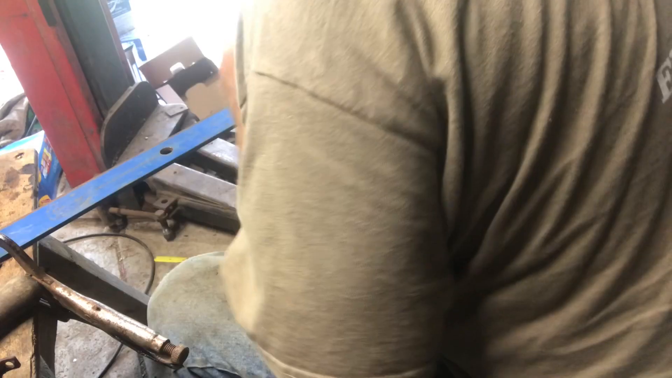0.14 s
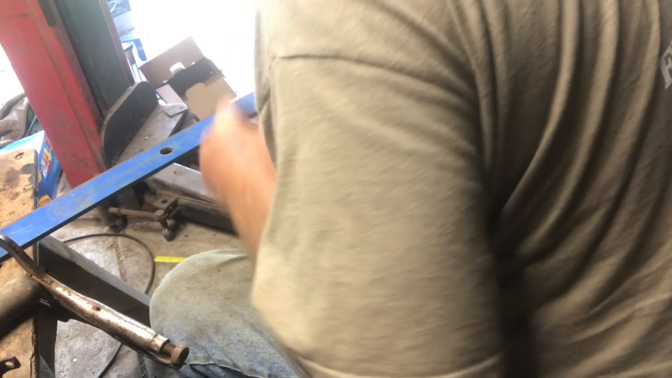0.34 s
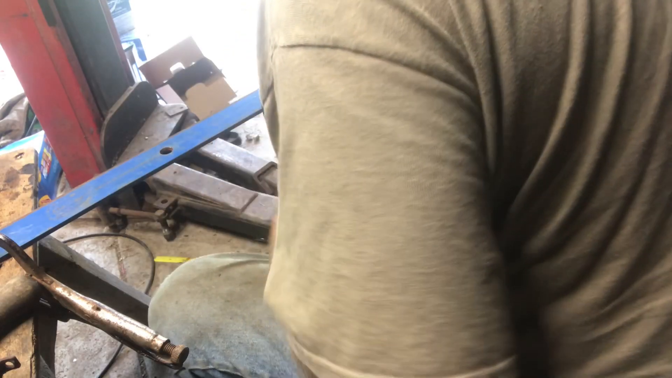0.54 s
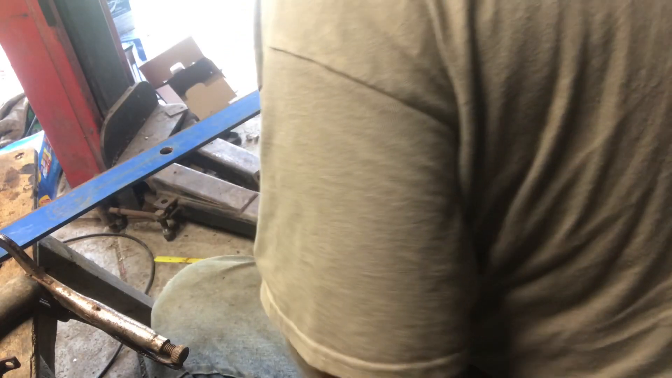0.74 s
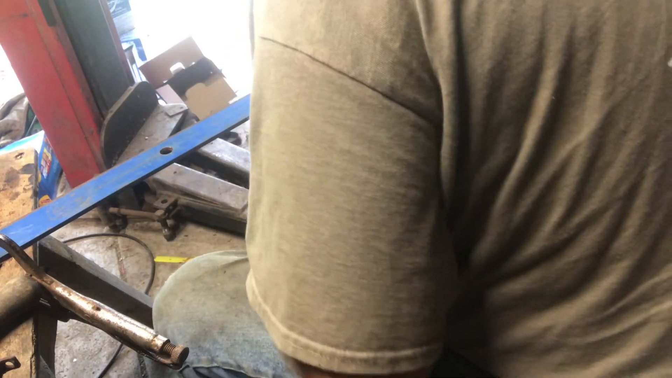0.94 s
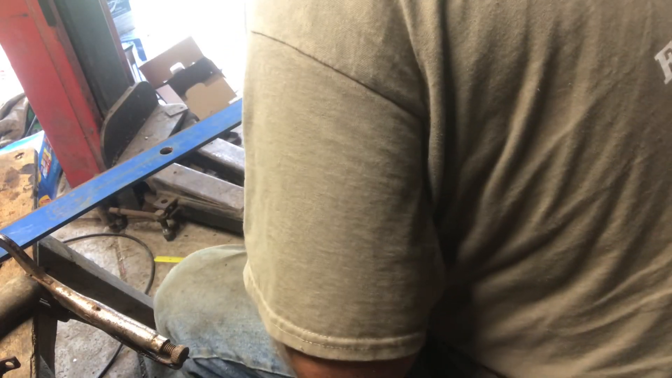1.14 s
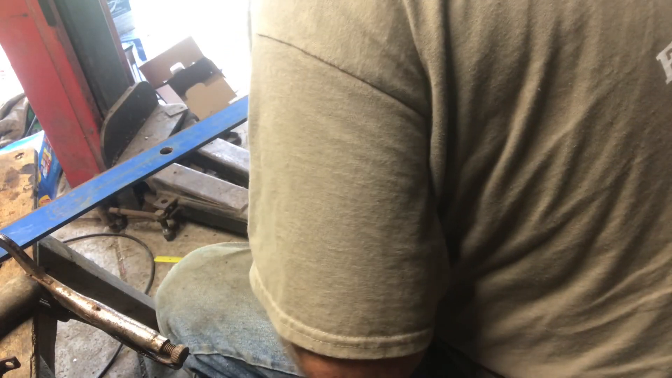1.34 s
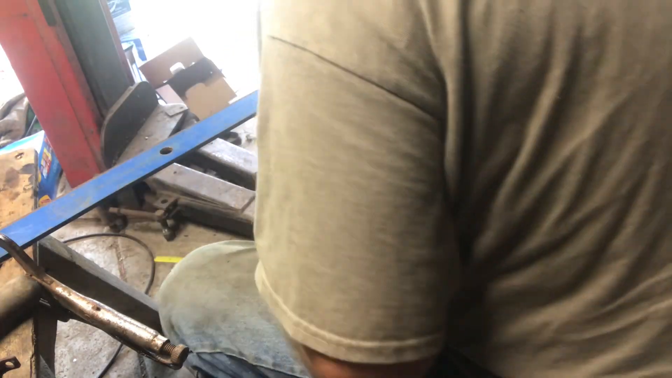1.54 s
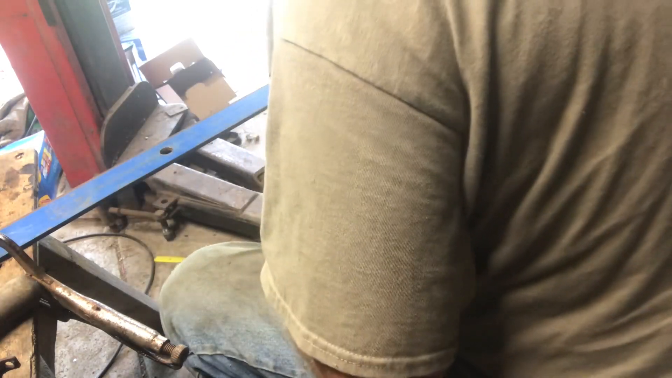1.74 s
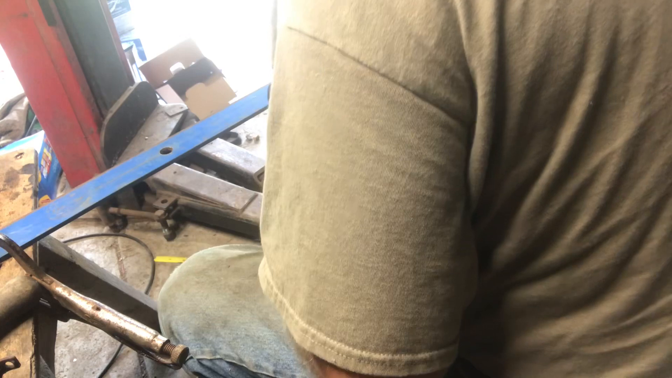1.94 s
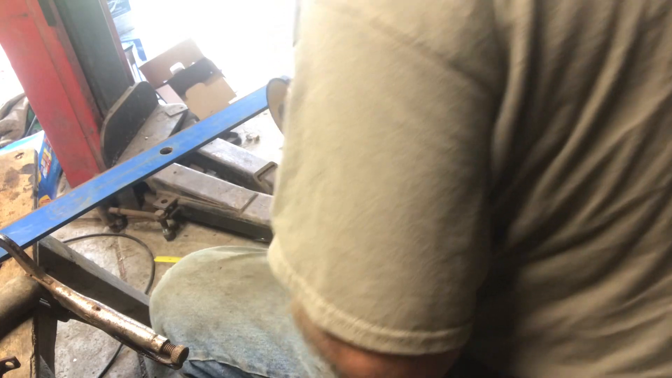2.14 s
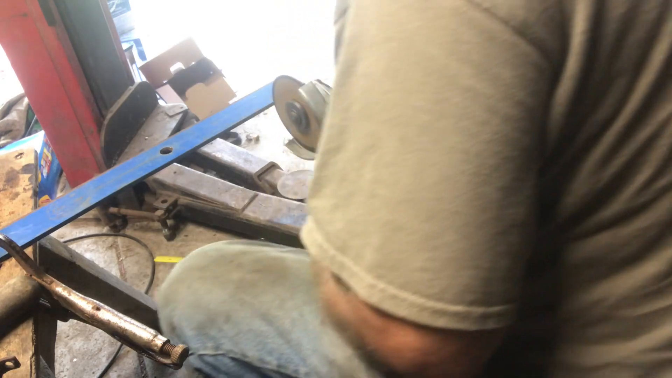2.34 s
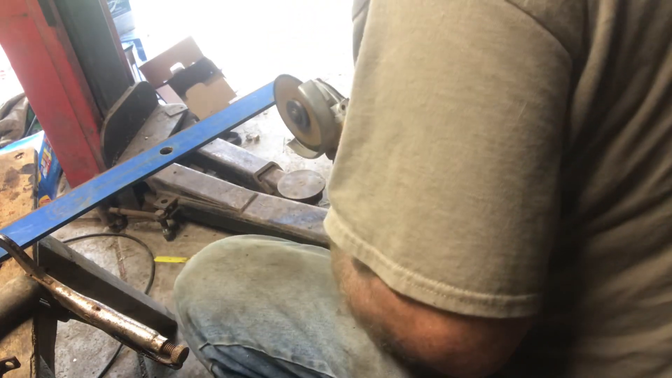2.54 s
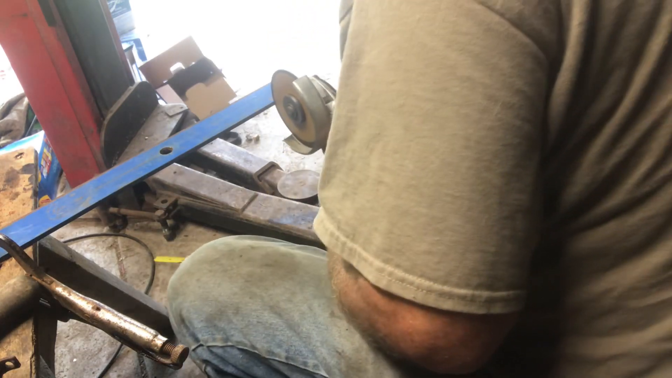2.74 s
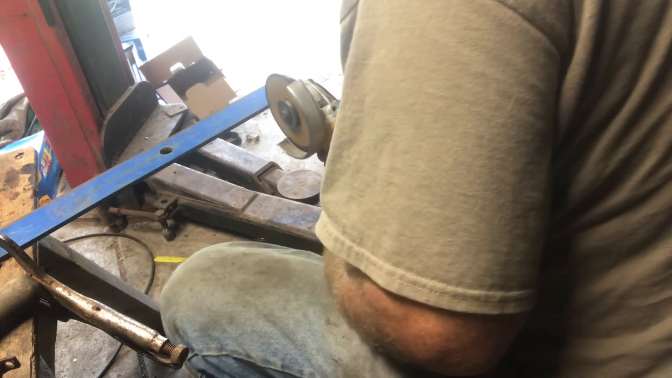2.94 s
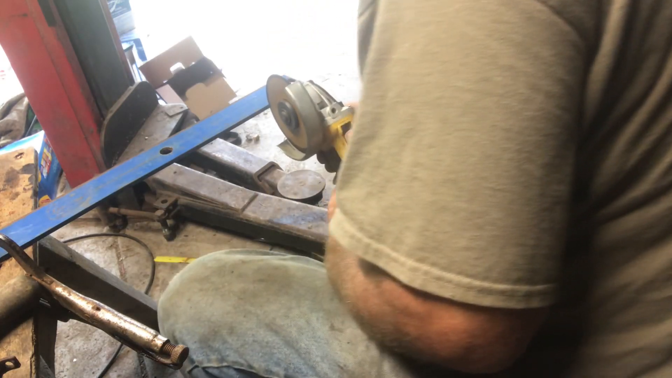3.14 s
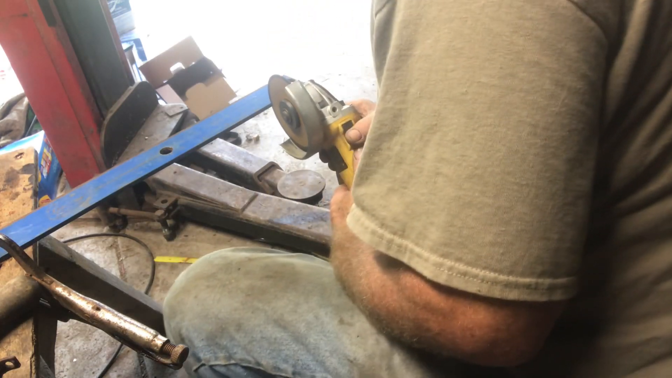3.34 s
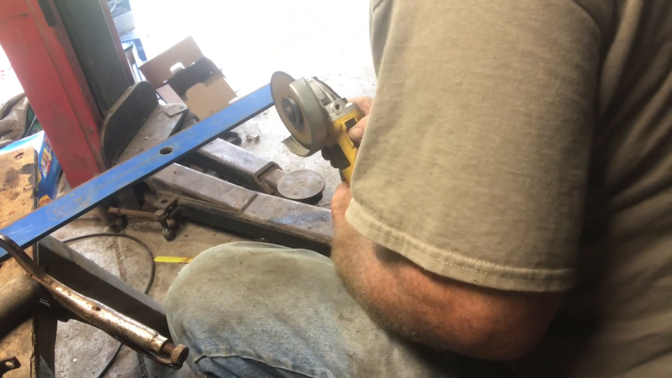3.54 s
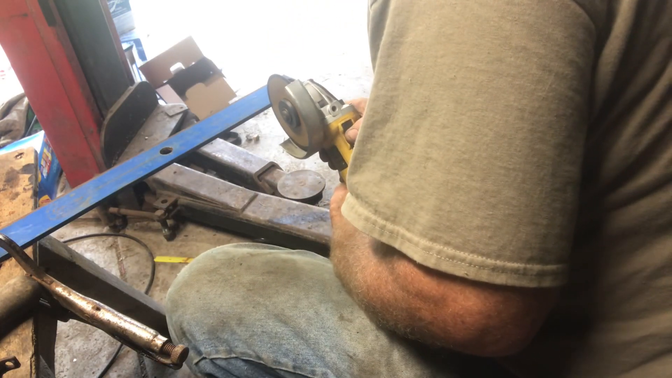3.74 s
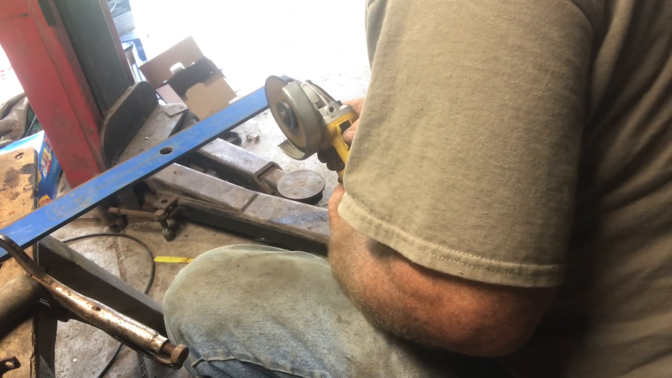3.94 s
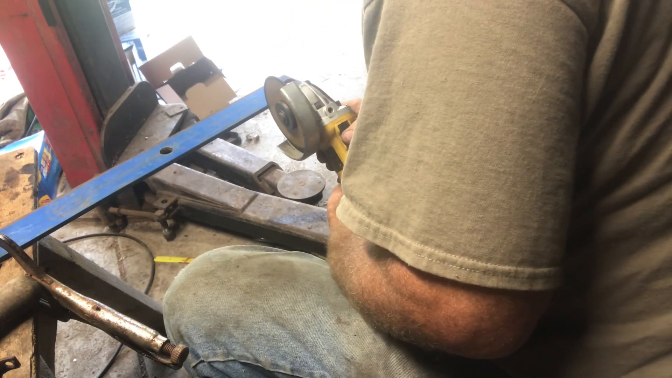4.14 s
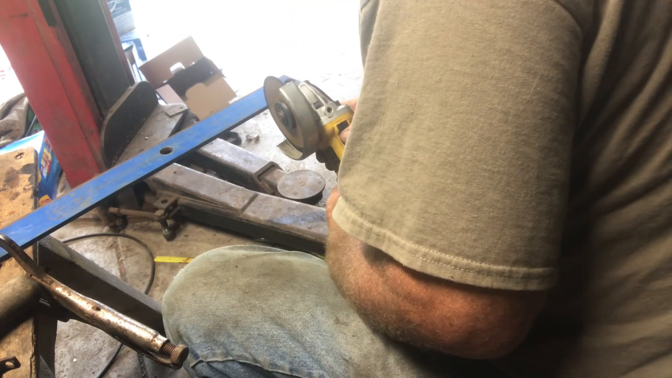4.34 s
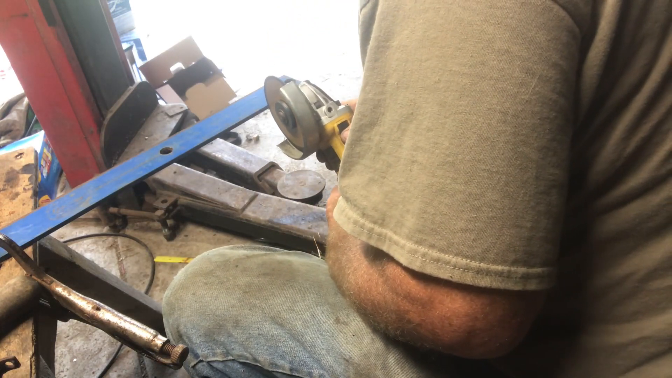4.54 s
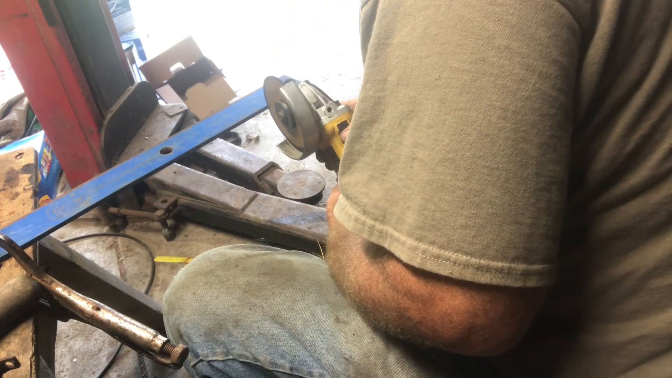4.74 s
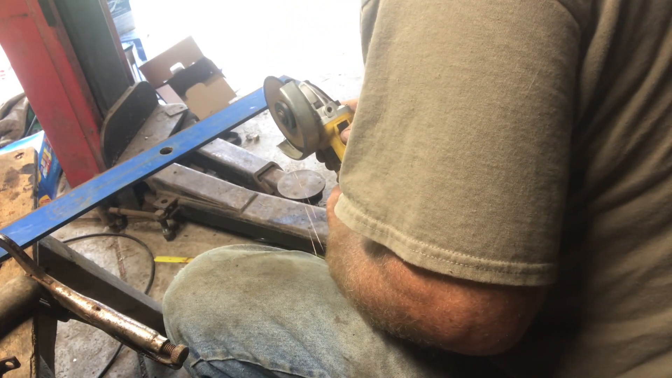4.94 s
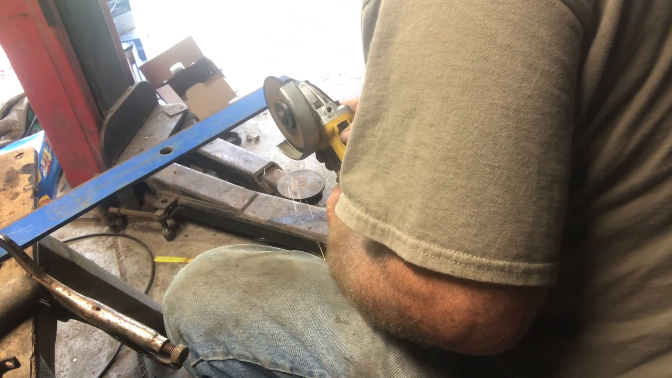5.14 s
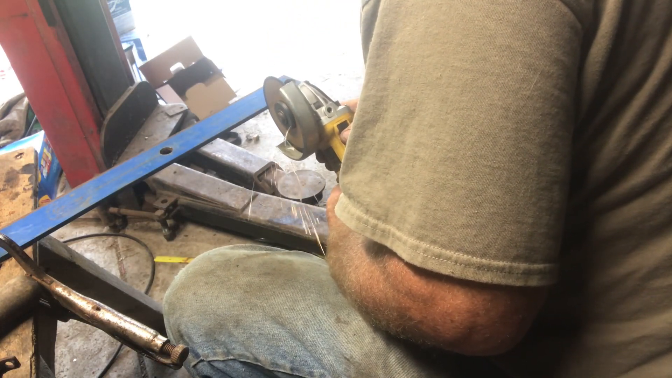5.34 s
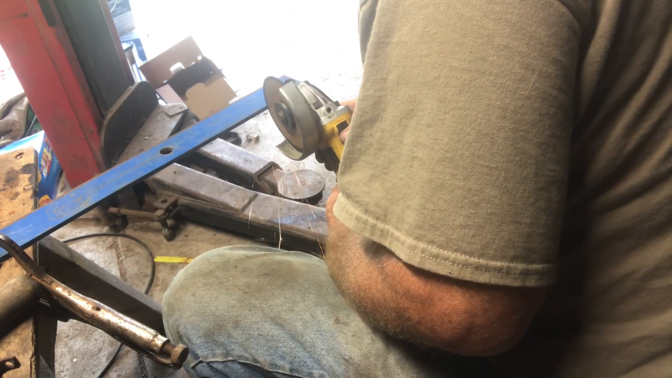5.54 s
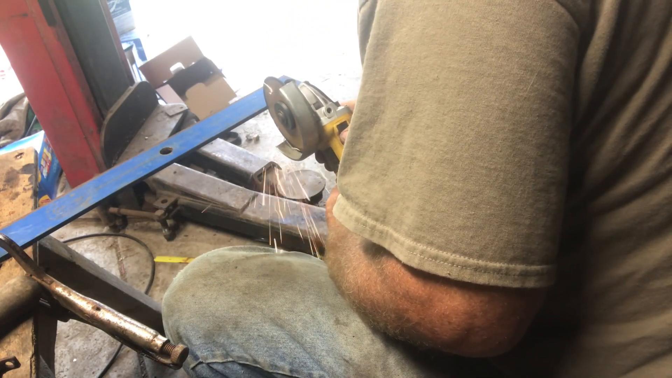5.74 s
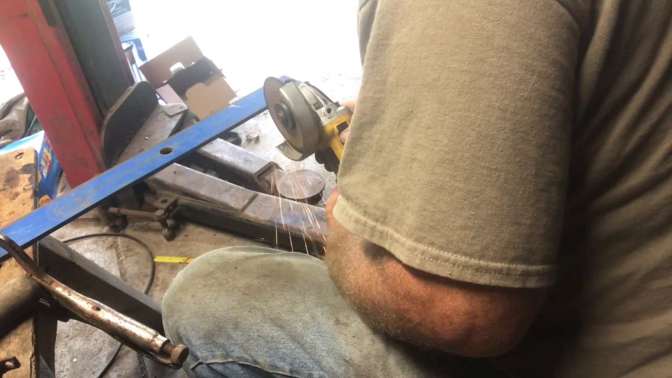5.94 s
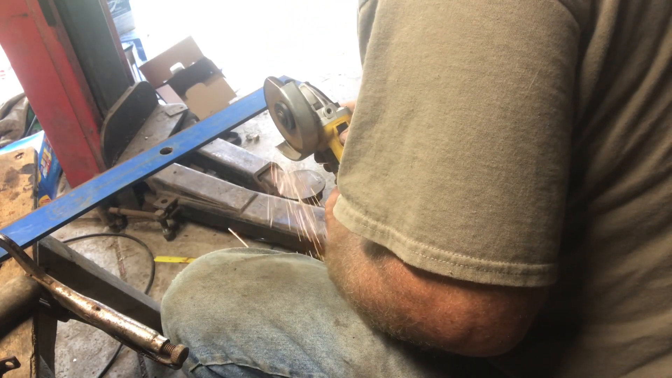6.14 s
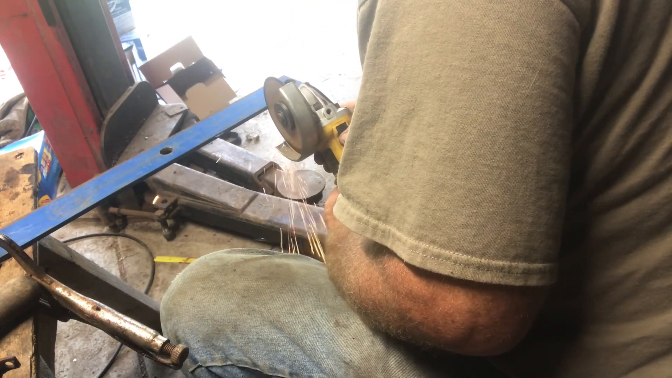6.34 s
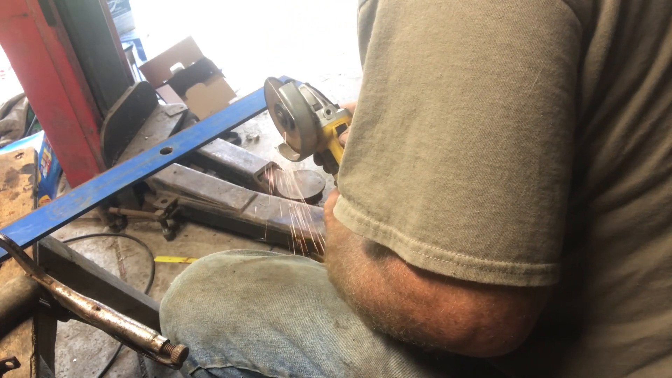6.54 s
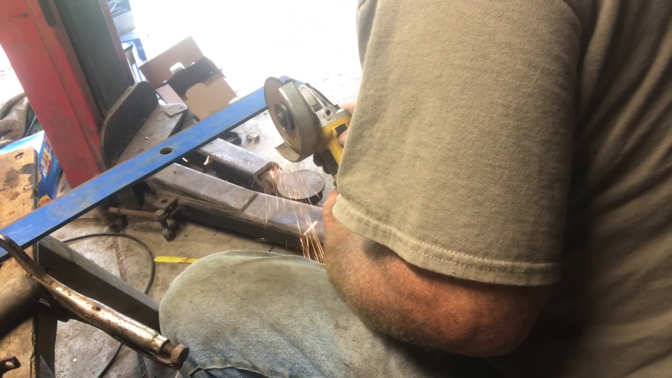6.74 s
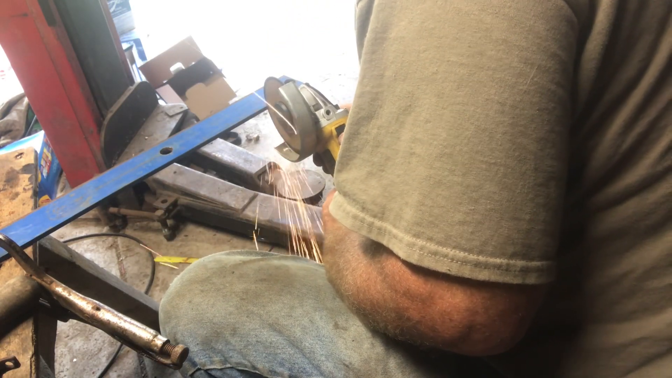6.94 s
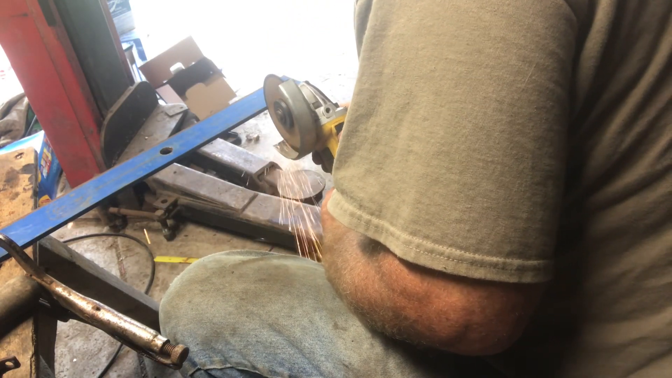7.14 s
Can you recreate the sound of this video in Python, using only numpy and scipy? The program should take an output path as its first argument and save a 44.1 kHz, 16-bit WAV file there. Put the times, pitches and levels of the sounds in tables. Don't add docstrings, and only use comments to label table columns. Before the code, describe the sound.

A brief low outdoor murmur cuts to near silence with a faint high cricket. After a click and small clattering knocks, an angle grinder spins up close by, gears rattling and fan hissing, and holds steady. It then grinds into steel with coarse raspy friction and a deep flexing drone that grows, judders and stutters as the tones sag. One close microphone; the cut continues to the end.

```python
import sys
import numpy as np
from scipy import signal
from scipy.fft import rfft, irfft, next_fast_len
from scipy.io import wavfile
from scipy.ndimage import uniform_filter1d, map_coordinates

SR = 44100
rng = np.random.default_rng(int(sys.argv[2]) if len(sys.argv) > 2 else 0)


def bounce(signal):
    frames = np.transpose(np.atleast_2d(signal))
    limited = np.clip(frames, -1, 1)
    pcm = np.round(limited * 32767).astype(np.int16)
    wavfile.write(sys.argv[1], SR, pcm)


def convert_level_to_amplitude(level_db):
    exponent = np.asarray(level_db, float) / 20
    return 10 ** exponent


N = 317079

# pitch_hz, density_db
YARD_SPECTRUM = [(18, -47), (30, -17), (55, -2), (107, 0), (158, -18), (328, -20.5), (404, -28), (629, -22),
                 (1270, -22), (2080, -37), (3150, -38), (3880, -42), (15000, -54)]
AIR_SPECTRUM = [(120, -7), (200, -3), (450, -8), (1000, -5), (2000, -14.5), (4300, -20.5), (5300, -25.5),
                (6300, -12), (7200, -26.5), (14000, -34), (15700, -31)]
RUMBLE_SPECTRUM = [(15, -37), (25, -16), (43, -8.5), (70, -2.5), (102, 1), (141, -10), (220, -21),
                   (290, -50), (480, -120)]
YARD_DB, AIR_DB, RUMBLE_DB = -50, -72, -67
# start_s, fade_out_s, fade_in_s
SCENE_CHANGE = (.141, .014, .04)
# start_s, change_db, half_length_s
GUST = (.6, 2.7, 0.077)
# start_level_db, free_speed_gain_db, full_load_gain_db
SHUDDER = (-66, 5, 8)
# pitch_hz, pitch_hz
WING_HZ = (6500, 6140)
# level_db, rise_db_per_s
CRICKET = (-74.5, 1)

ON_S, TOUCH_S = 1.47, 4.5
# pitch_hz, level_db, decay_t60_s
SWITCH_RING = [(1900, -23, .025), (3300, -31, .015), (7500, -46, .01), (13500, -57, .01)]
# start_s, level_db, decay_t60_s
KNOCKS = [
    (1.471, -34, 0.0087),
    (1.4806, -28, 0.018),
    (1.499, -27, 0.011),
    (1.522, -30, .008),
    (1.548, -31, .008),
    (1.814, -21, 0.012),
    (2.100, -27, .008),
    (2.104, -23, 0.015),
    (2.111, -22, .01),
]
FREE_RPS = 177.1
# gap_turns_per_s, time_constant_s
SPIN_UP_LAGS = [(74, .52), (73, .13)]
# start_s, loss_turns_per_s
SAG = [(4.45, 0), (4.9, 2.1), (5.1, 3.8), (5.5, 8.1), (5.9, 13.1), (6.3, 16.9), (6.5, 17.9), (7.19, 20.3)]
# pitch_hz, density_db
STARTING_SPECTRUM = [(120, -43), (200, -14), (272, -16.5), (357, 2.5), (789, -7.5), (1200, 3), (1460, -4),
                     (2090, -4.5), (2420, -6), (3010, 0.5), (5450, -18), (7020, -14.5), (15000, -43)]
RUNNING_SPECTRUM = [(120, -51), (200, -23.5), (316, -22.5), (340, -15.5), (489, -7.5), (517, -7.5),
                    (566, -11.5), (620, -9), (772, -7.5), (2150, -6), (2870, 3), (4970, -10.5),
                    (7160, -17.5), (10500, -22.5), (15700, -27.5)]
# pitch_hz, width_hz, lift_db
HOUSING_MODES = [(1864, 51, 3), (276, 52, 6.5), (3800, 310, 2), (4560, 190, 2), (7840, 270, -3.5),
                 (10400, 400, -4.5), (968, 42, 4), (1380, 340, 4), (1776, 195, 5), (2450, 17, 3),
                 (2940, 68, 1), (3110, 60, -2), (3250, 97, 6.5), (3512, 45, 9), (5540, 350, 4),
                 (5995, 106, 8.5), (6100, 380, 2.5), (6800, 210, 6), (15200, 1400, -8), (7210, 120, 12),
                 (9400, 400, 4.5), (11300, 250, 2.5)]
# free_speed_level_db, power_of_speed
RATTLE = (-28.5, 1.2)
BODY = (-30.5, 0.74)
HISS = (-44.5, 2.5)
# rattle_db, body_db, hiss_db
SLACK_DB = (-1.2, -1.8, 2.2)
# rattle_s, body_s, hiss_s
WAKE_S = (.11, .008, .035)
MESH_S = 1.82
FLOOR_RPS = 100

GEAR, BLADES = 3.55, 25
# multiple_of_disc_turn, free_speed_level_db, power_of_speed, full_load_gain_db
ORDERS = [
    (1, -48.5, 2.5, 4),
    (2, -49.5, 22, 0),
    (3, -46, 6, 6),
    (GEAR, -51, -0.78, -1.5),
    (4, -58.5, -0.5, 12),
    (5, -60.5, 1.1, 12),
    (6, -51, 3, 3),
    (GEAR * BLADES, -56, 1.5, -9),
]
# pitch_hz, width_hz, lift_db
PASSED_MODES = [(169.3, 11, 4.5), (455, 24, 5.5), (494, 24, 9), (580, 15.7, 6), (606, 18, 14.5),
                (632.4, 7.7, 3), (662.6, 37.4, 12), (806, 20, 12.5), (1020, 60, 6), (15200, 600, 7),
                (15590, 70, -9)]
# pitch_hz, width_hz, lift_db
BAR_MODE = (328.5, 20, 9.2)
FLEX_DB, FLEX_GROWS_S = -31, 0.27
# start_s, change_db, half_length_s
GRABS = [(4.95, 3.5, 0.035), (5.02, -6, .02), (5.08, 3.5, .04), (5.27, -4, .04), (5.7, -3, .03),
         (6.43, -3.5, 0.047), (6.51, 4.5, 0.035), (6.58, -8, .015), (6.65, -8, 0.024), (6.7, 3, .02),
         (6.8, -5, 0.024), (6.84, 4, .012), (6.865, -7, .012), (6.97, -7, .05), (7.02, 4.5, .015),
         (7.065, -10, .02), (7.14, 3, .05)]
JUDDER_HZ, JUDDER_PEAK_S, JUDDER_DEPTH = 12.9, 6.08, .22

# pitch_hz, density_db
CUTTING_SPECTRUM = [(120, -53), (200, -10), (283, -13.5), (321, -3.5), (438, -9.5), (480, -14.5),
                    (536, -13), (862, -15), (1020, -4.5), (2150, -28), (2620, -5), (3580, -10), (4970, -34),
                    (7160, -31.5), (15700, -40)]
# pitch_hz, width_hz, lift_db
BAR_MODES = [(684, 61, 6), (1036, 94, 4.5), (1913, 71, 13.5), (2443, 117, 8), (2550, 33, -0.5),
             (2940, 50, -1.5), (3206, 36, -8), (3340, 40, 3), (3632, 52, 9), (4350, 110, 5), (4370, 130, 5),
             (3740, 55, 4), (2180, 130, -2), (4614, 160, 12), (5030, 200, -7), (5414, 150, 12.5),
             (5900, 660, 9.5), (7180, 210, 8.5), (8320, 94, 8.5), (9140, 370, 9), (10500, 400, -5.5),
             (11240, 310, 6.5)]
# start_s, pressure_db, half_length_s
LEANS = [(4.74, 3, 0.038), (4.84, -9.5, 0.051), (4.93, 1.5, .03), (4.99, -7, 0.03), (5.05, 1, 0.049),
         (5.28, -2.5, .06), (5.4, 2, .04), (5.55, 1.5, 0.07), (5.92, -2, 0.057), (6.44, -2.5, 0.058),
         (6.52, 1.5, .04), (6.7, -1.5, .04), (6.98, 1.5, .08), (7.17, 1, 0.054)]
SINK_S, SINK_DB = 0.23, -11
# light_cut_level_db, full_load_gain_db, share_of_leaning
BITE = (-23, 4, 0.86)
SPARKS = (-33.3, -3, 0.8)
GROWL = (-38, 15.5, 0.3)
REPEAT = (.2, 0.5)
REPEAT_FADE_LOAD = .15


def unit(x):
    return x / np.sqrt(np.mean(x ** 2) + 1e-20)


def clock():
    return np.arange(N) / SR


def since(s):
    return np.arange(N) >= s * SR


def curves(rows):
    s, *columns = np.transpose(rows)
    return [np.interp(clock(), s, column) for column in columns]


def bumps(rows):
    t = clock()[::64]
    swells = sum(db * np.exp(-((t - s) / half) ** 2) for s, db, half in rows)
    return np.interp(clock(), t, swells)


def wobble(rate):
    knots = rng.standard_normal(int(N * rate / SR) + 4)
    at = np.arange(0, len(knots) - 3, 1 / 12)
    return np.interp(np.arange(N) * rate / SR, at, map_coordinates(knots, [at]))


def resonance_db(hz, modes):
    return sum(db / (1 + (2 * (hz - centre) / width) ** 2) for centre, width, db in modes)


def lift(hz, modes):
    grid = np.linspace(hz.min(), hz.max(), 2000)
    return np.interp(hz, grid, resonance_db(grid, modes))


def coloured(x, spectrum, modes=(), lo_hz=1, hi_hz=22000):
    m = next_fast_len(N + 8192)
    hz = np.fft.rfftfreq(m, 1 / SR) + 1
    pitch_hz, level_db = np.transpose(spectrum)
    db = np.interp(np.log(hz), np.log(pitch_hz), level_db) + resonance_db(hz, modes)
    edges = 1 / np.sqrt((1 + (lo_hz / hz) ** 8) * (1 + (hz / hi_hz) ** 8))
    return unit(irfft(rfft(x, m) * convert_level_to_amplitude(db) * edges, m)[:N])


def three_bands(x, spectrum, modes, db, low_db, high_db):
    low = coloured(x, spectrum, modes, 1, 2100)
    main = coloured(x, spectrum, modes, 2100, 7500)
    top = coloured(x, spectrum, modes, 7500, 22000)
    return convert_level_to_amplitude(db) * (main + convert_level_to_amplitude(low_db) * low + convert_level_to_amplitude(high_db) * top)


def shed(speed, load):
    start_db, speed_gain_db, load_gain_db = SHUDDER
    shudder_db = start_db + speed_gain_db * (speed / FREE_RPS) ** 4 + load_gain_db * load
    low_db = np.where(since(ON_S), shudder_db, RUMBLE_DB) + 1.3 * wobble(6)
    air = convert_level_to_amplitude(AIR_DB + bumps([GUST]) + 7.0) * coloured(rng.standard_normal(N), AIR_SPECTRUM)
    rumble = convert_level_to_amplitude(low_db + 3.5) * coloured(rng.standard_normal(N), RUMBLE_SPECTRUM)
    yard = convert_level_to_amplitude(YARD_DB) * coloured(rng.standard_normal(N), YARD_SPECTRUM)
    return np.where(since(SCENE_CHANGE[0]), air + rumble, yard)


def cricket():
    t = clock()
    stroke = np.clip(np.cos(2 * np.pi * 37.45 * (t - 1.451)) + .2, 0, None) ** .7
    song = np.zeros(N)
    for hz, db in zip(WING_HZ, [-.5, -9]):
        song += convert_level_to_amplitude(db + 1.2 * wobble(60)) * np.sin(2 * np.pi * hz * t + .4 * wobble(120))
    level_db, rise_db = CRICKET
    level = convert_level_to_amplitude(level_db + rise_db * np.minimum(t, ON_S) + 4)
    return since(SCENE_CHANGE[0]) * level * stroke * song


def switch():
    age = np.clip(clock() - 1.4793, 0, 1)
    return sum(convert_level_to_amplitude(db - 60 * age / t60) * np.sin(2 * np.pi * hz * age) for hz, db, t60 in SWITCH_RING)


def knocks():
    blows = np.zeros(N)
    age = np.arange(SR // 10) / SR
    for s, db, t60 in KNOCKS:
        blows[round(s * SR):][:len(age)] += convert_level_to_amplitude(db - 60 * age / t60) * (1 - np.exp(-age / 0.00055))
    dull = coloured(rng.standard_normal(N), [(300, -28), (2000, 9), (4000, -1), (6000, -24), (15500, -48)])
    bright = coloured(rng.standard_normal(N), [(300, -20), (3500, 3), (6000, -8), (9000, -12), (15500, -23)])
    return 1.7 * blows * np.where(since(2), bright, dull)


def drive():
    sag, = curves(SAG)
    age = np.clip(clock() - ON_S, 0, None)
    missing = sum(gap * np.exp(-age / tau) for gap, tau in SPIN_UP_LAGS)
    return FREE_RPS - missing - sag, sag / sag[-1]


def running_levels(speed):
    speed_db = 20 * np.log10(np.clip(speed, FLOOR_RPS, None) / FREE_RPS)
    slack = np.clip((MESH_S - clock()) / 0.052, 0, 1)
    levels = []
    for (at_db, power), step_db, rise_s in zip([RATTLE, BODY, HISS], SLACK_DB, WAKE_S):
        wake_db = 20 * np.log10(np.clip((clock() - ON_S + 0.0043) / rise_s, .02, 1))
        levels.append(at_db + power * speed_db + step_db * slack + wake_db)
    rattle, body, hiss = levels
    return rattle, body - rattle, hiss - rattle


def motor(turns, speed):
    db, body_db, hiss_db = running_levels(speed)
    mains = np.cos(2 * np.pi * 120 * clock())
    pulse_db = .4 * mains + .4 * np.cos(2 * np.pi * turns)
    grain = convert_level_to_amplitude(1.2 * wobble(900) + pulse_db + 0.22 * wobble(12))
    fan = np.clip((clock() - 1.6) / 0.45, 0, 1)
    run = three_bands(grain * rng.standard_normal(N), RUNNING_SPECTRUM, HOUSING_MODES,
                      db + 0.14, body_db + 0.21, hiss_db + 0.37)
    starting_modes = [(363, 150, -4.5), (500, 80, 6), (2100, 180, 5), (4160, 390, 7), (6860, 400, 6.0),
                      (9200, 600, 9), (13800, 1500, 10)]
    start = three_bands(grain ** 1.4 * rng.standard_normal(N), STARTING_SPECTRUM, starting_modes,
                        db + 0.33, body_db + 0.3, hiss_db + .3)
    return since(ON_S - .01) * (np.sqrt(fan) * run + np.sqrt(1 - fan) * start)


def flexing_db(speed, load):
    swing = np.cos(2 * np.pi * JUDDER_HZ * (clock() - JUDDER_PEAK_S))
    judder = 1 + JUDDER_DEPTH * load ** 2 * swing
    sinking_db = SINK_DB * np.clip(1 - (clock() - TOUCH_S) / FLEX_GROWS_S, 0, 1)
    return FLEX_DB + sinking_db + bumps(GRABS) + lift(2 * speed, [BAR_MODE]) + 20 * np.log10(judder)


def hum(turns, speed, load):
    speed_db, bite = 20 * np.log10(speed / FREE_RPS), np.sqrt(load)
    cutting = since(TOUCH_S)
    levels = [db + power * speed_db + gain_db * bite + lift(k * speed, PASSED_MODES)
              for k, db, power, gain_db in ORDERS]
    flex_db = flexing_db(speed, load)
    levels[1] = np.where(cutting, flex_db - 1.2, levels[1])
    # phase in radians, fast and slow level in dB
    drift = [.05, .12, .3, .3, .3, .3, .3, .8]
    flutter_db = [0.55, 1.1, 0.99, 1.9, 1.3, 1.4, 2.0, 2.5]
    wander_db = [.15, .3, 1.2, .8, 1.6, 1.1, 1.5, 1.2]
    tones = []
    for (k, *_), db, d, f, w in zip(ORDERS, levels, drift, flutter_db, wander_db):
        level = convert_level_to_amplitude(db + 3.5 + f * wobble(35) + w * wobble(5))
        tones.append(level * np.sin(2 * np.pi * k * turns + d * wobble(40 + 1.5 * k)))
    tones[5:7] = [cutting * tone for tone in tones[5:7]]
    shaken = np.clip(1.44 * load - .25, .1, 1)
    ringing = coloured(rng.standard_normal(N), [(200, -24.5), (300, -10.5), (365, 2.0), (420, -26), (600, -54)])
    mode = shaken * convert_level_to_amplitude(flex_db - 7.5) * ringing
    return (sum(tones) + cutting * mode) * np.clip((clock() - 1.57) / .1, 0, 1)


def pressure():
    return SINK_DB * np.clip(1 - (clock() - TOUCH_S) / SINK_S, 0, 1) + bumps(LEANS)


def worn_rim(turns):
    grit = rng.standard_normal((60, 281))
    grit[:, -1] = grit[:, 0]
    age = (turns - turns[-1]) / 30 + 58
    return unit(map_coordinates(grit, [age, turns % 1 * 280], order=1, mode="nearest"))


def cut(turns, load):
    bite, leaning_db = np.sqrt(load), pressure()
    db, sparks_db, growl_db = (at_db + gain_db * bite + part * leaning_db
                               for at_db, gain_db, part in [BITE, SPARKS, GROWL])
    share = REPEAT[0] + REPEAT[1] * np.exp(-load / REPEAT_FADE_LOAD)
    rim = worn_rim(turns)
    runout_db = 3.1 * np.cos(2 * np.pi * turns) + 0.89 * np.cos(4 * np.pi * turns + 1.8)
    high_spot = convert_level_to_amplitude(share * runout_db)
    share = np.clip(share, 0, 1)
    fresh = unit(convert_level_to_amplitude(2.8 * wobble(700)) * rng.standard_normal(N))
    scrape = np.sqrt(share) * rim + np.sqrt(1 - share) * fresh
    touch = np.clip((clock() - TOUCH_S) / 0.092, 0, 1)
    tremor = convert_level_to_amplitude(0.53 * wobble(16))
    return touch * three_bands(scrape * high_spot * tremor, CUTTING_SPECTRUM, BAR_MODES,
                               db - 2.0, growl_db - db - .7, sparks_db - db + .7)


def patchy(x, depth_db):
    z = signal.stft(x, nperseg=512)[2]
    field = uniform_filter1d(rng.standard_normal(z.shape), size=4, axis=0)
    field = uniform_filter1d(field, size=40, axis=1)
    return signal.istft(z * convert_level_to_amplitude(depth_db * unit(field)), nperseg=512)[1][:N]


def scene():
    speed, load = drive()
    turns = np.cumsum(speed) / SR
    noise = patchy(motor(turns, speed) + cut(turns, load), depth_db=.8)
    tool = hum(turns, speed, load) + noise + knocks() + switch()
    s, fade_out, fade_in = SCENE_CHANGE
    fade = np.clip(np.maximum((s - clock()) / fade_out, (clock() - s) / fade_in), .05, 1)
    mono = fade * (tool + cricket() + shed(speed, load))
    return np.array([mono, mono])


def band_limit(x):
    return signal.sosfilt(signal.butter(12, 17000, fs=SR, output="sos"), x)


def record(dry):
    m = next_fast_len(N + 8192)
    hz = np.fft.rfftfreq(m, 1 / SR)
    response = (hz < 15740) * hz ** 3 / (hz ** 3 + 36 ** 3)
    mix = irfft(rfft(dry, m) * response, m)[:, :N]
    peak_limit, knee = .66, 5
    mix = mix / (1 + np.abs(mix / peak_limit) ** knee) ** (1 / knee)
    return band_limit(mix)


dry = scene()
out = record(dry)
bounce(out)
```